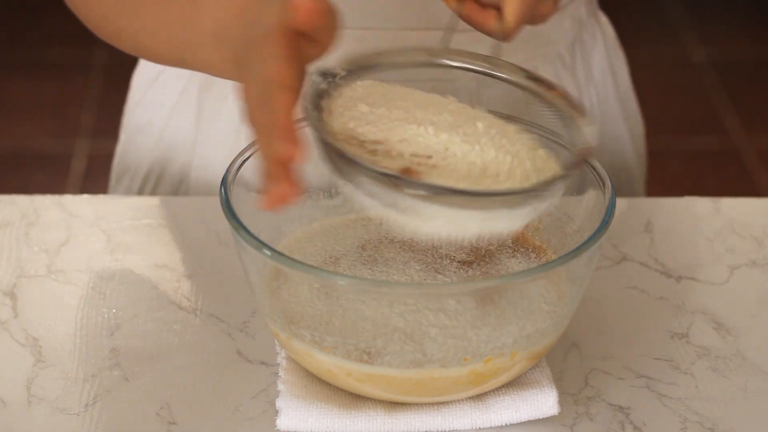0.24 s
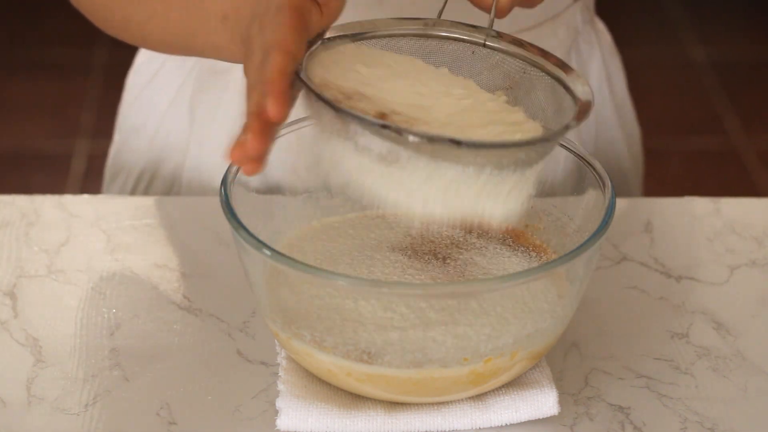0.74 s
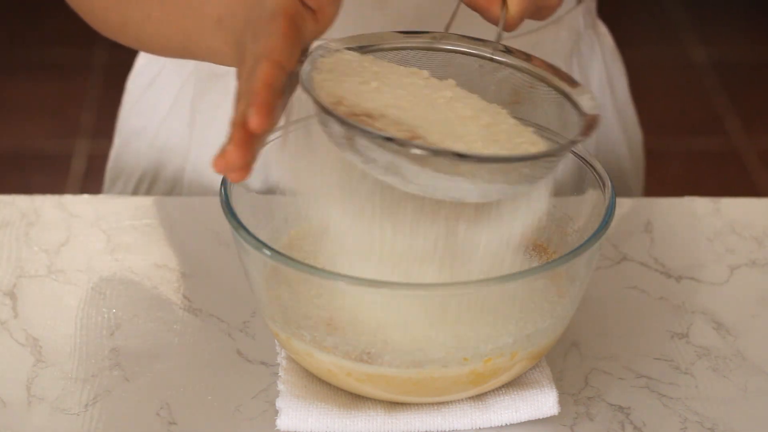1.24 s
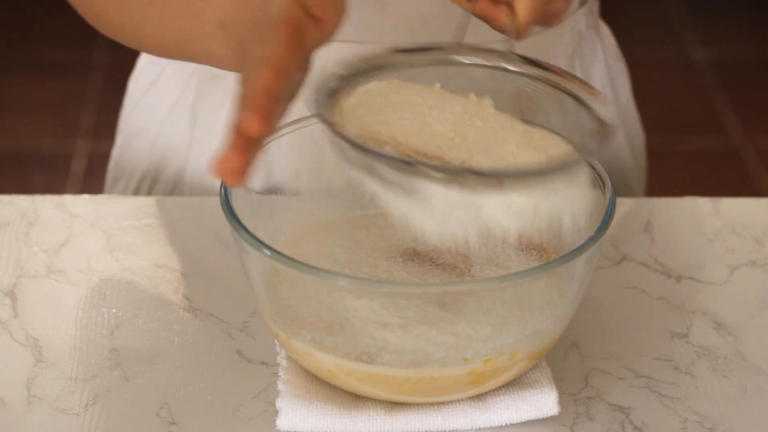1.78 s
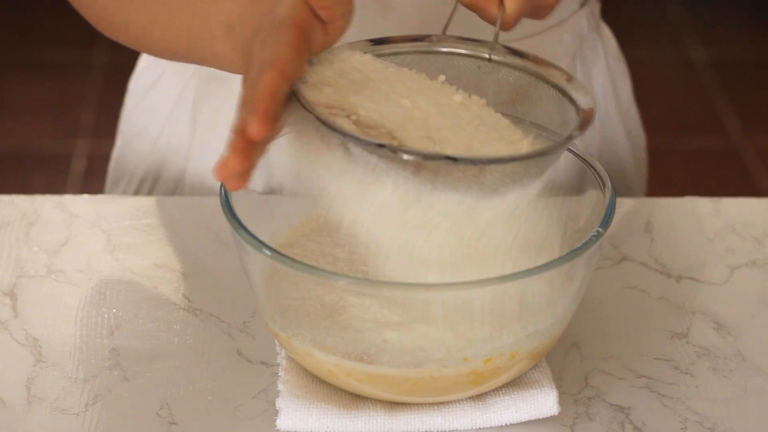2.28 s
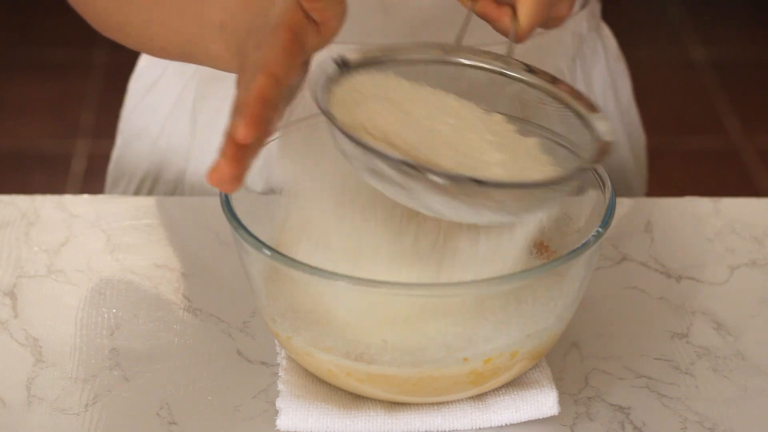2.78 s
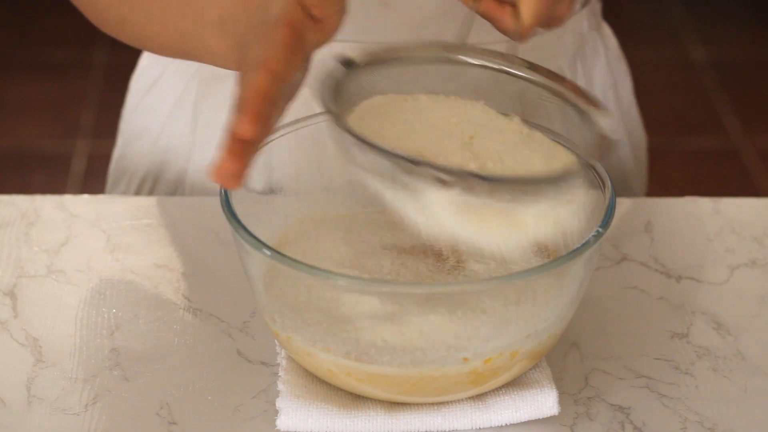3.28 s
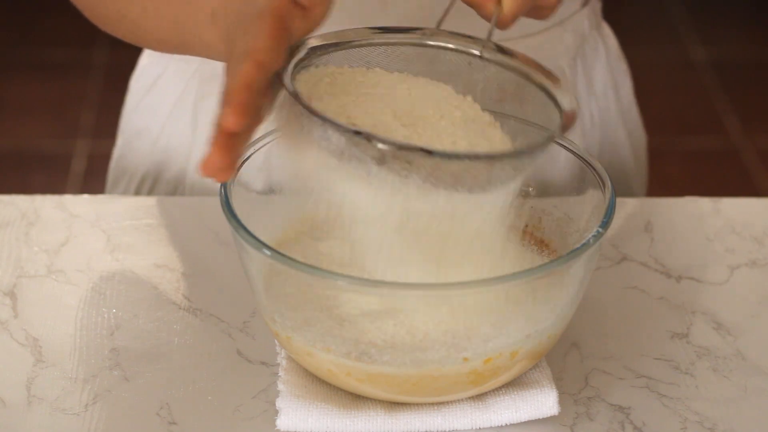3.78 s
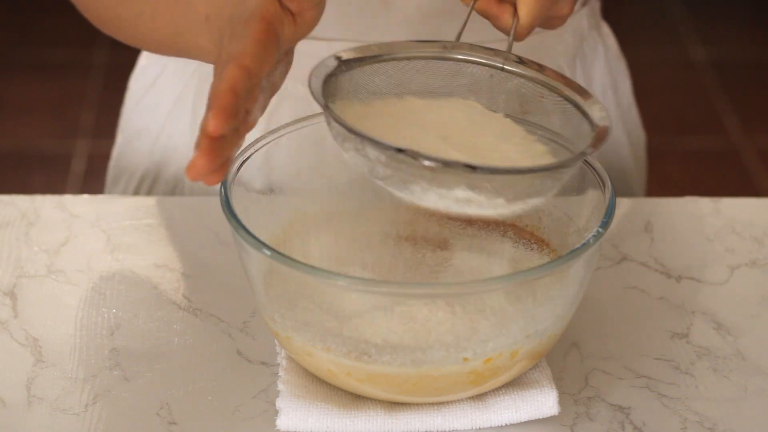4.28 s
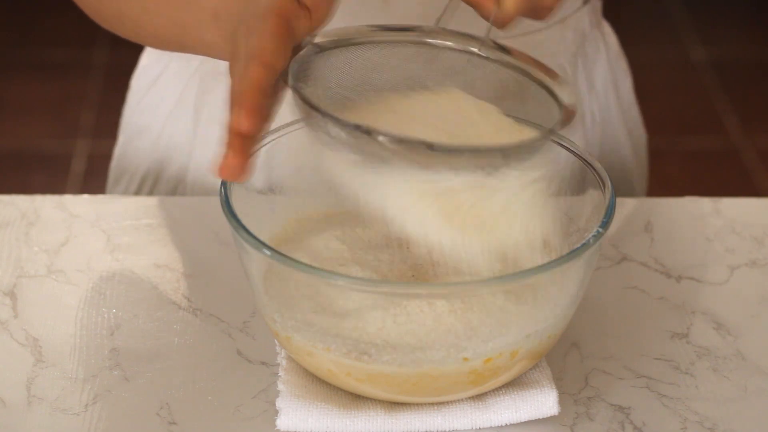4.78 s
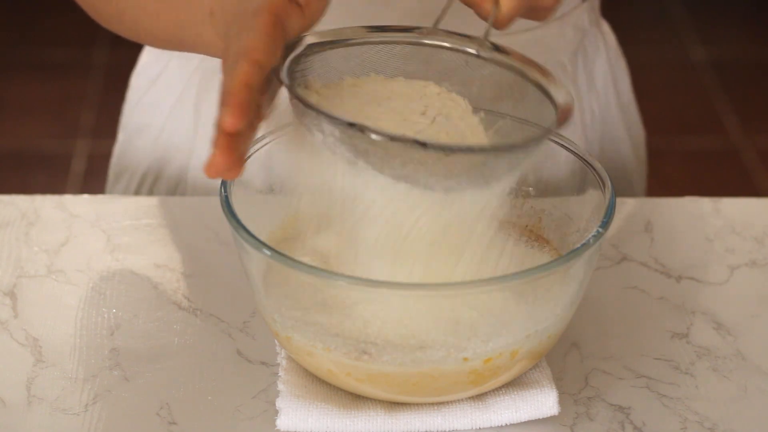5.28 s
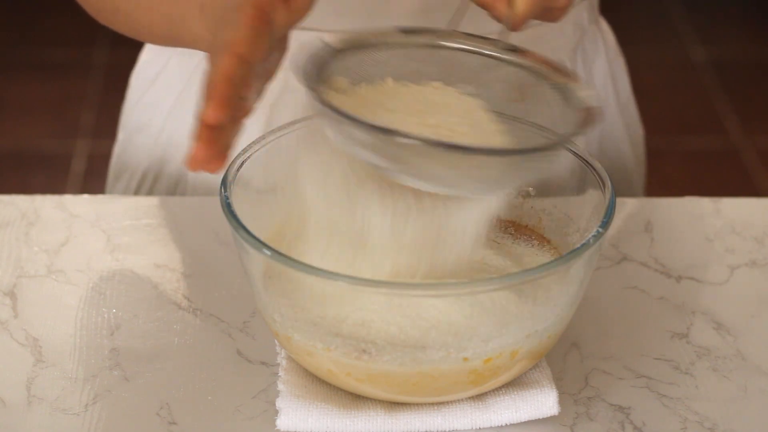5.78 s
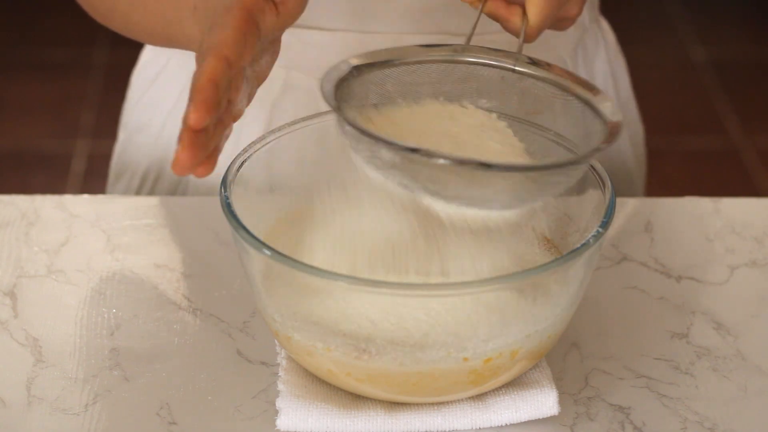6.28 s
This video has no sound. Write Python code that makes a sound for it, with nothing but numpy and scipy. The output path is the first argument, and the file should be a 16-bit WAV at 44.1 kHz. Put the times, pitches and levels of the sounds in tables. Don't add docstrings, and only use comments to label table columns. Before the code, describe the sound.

Flour is sifted by hand in a hard-walled kitchen, miked close with only a faint short room tail. Rapid, slightly uneven palm thumps continue throughout, with short sprays of powder through mesh, later stretching into a softer swishing sound. The rim barely rings, fingertips tick lightly, and low rumble, fridge hum and a high wavering whine stay underneath.

```python
import sys
import numpy as np
from scipy import signal
from scipy.fft import rfft, irfft
from scipy.io import wavfile
from scipy.ndimage import uniform_filter1d

SR = 44100
rng = np.random.default_rng(int(sys.argv[2]) if len(sys.argv) > 2 else 0)


def gain_from_db(level_db):
    decades = np.asarray(level_db, float) / 20
    return 10 ** decades


def int16_out(signal):
    q = np.round(np.clip(np.atleast_2d(signal).T, -1, 1) * 32767)
    wavfile.write(sys.argv[1], SR, q.astype(np.int16))


N = 288414
TIME = np.arange(N) / SR
FINGERS_LAG_S = .0085

# time in seconds, heel of hand in dB, fingers in dB, rim ring in dB.
TAPS = [(0.183, -52, -52, -72), (0.407, -38.5, -42.5, -58.5), (0.624, -46, -43.5, -70),
        (0.837, -42, -48, -62), (1.052, -49, -43, -57.5), (1.270, -47.5, -50, -57),
        (1.488, -45, -41.5, -58.5), (1.700, -45, -48, -55), (1.925, -51, -34.5, -56),
        (2.142, -36, -36.5, -52.5), (2.358, -40.5, -36, -55), (2.584, -43.5, -39, -57.5),
        (2.798, -40.5, -46, -66), (3.019, -56, -41, -65), (3.208, -55, -52, -66), (3.425, -41, -44, -65),
        (3.635, -51, -49, -62), (3.847, -48, -49, -68), (4.045, -37, -44.5, -71), (4.243, -51, -51, -78),
        (4.456, -41, -55, -69), (4.687, -54, -42, -60), (4.902, -36.5, -43.5, -66),
        (5.118, -39.5, -47, -68), (5.354, -59, -44, -66), (5.567, -55, -40, -64), (5.797, -43, -49, -71),
        (6.015, -59, -51, -61), (6.255, -53, -55, -73), (6.477, -54, -56, -69)]
# spray in dB, slide in dB, slide's lead on the tap in ms,
# heap slump in dB.
FLOUR = [(-68, -73, 37, -63), (-61.5, -67.5, 11, -71), (-55, -70.5, 28, -63), (-50.5, -70, 12, -65),
         (-50, -68.5, 1, -51), (-55.5, -67.5, 12, -56), (-52, -68.5, 30, -62), (-51, -69, 34, -48.5),
         (-51, -73, -15, -50), (-50, -71, 3, -55), (-50.5, -67, 12, -49), (-53, -70.5, 12, -57),
         (-55.5, -59.5, 30, -52.5), (-50.5, -69, 45, -56), (-53, -61, 28, -52), (-53, -61, 27, -53.5),
         (-53, -67.5, 35, -63), (-54, -69, 42, -61), (-56.5, -58.5, 32, -49.5), (-58, -67, 12, -58),
         (-54, -58.5, 20, -59), (-49.5, -62.5, 21, -55), (-54.5, -59.5, 28, -55), (-56, -61.5, 16, -51),
         (-50.5, -62.5, 57, -51), (-55, -58.5, 30, -52.5), (-56, -64, 38, -54.5), (-54, -58, 29, -66),
         (-55.5, -60, 30, -57), (-58, -60, 39, -73)]
# ratio to the strongest mode, level in dB, t60 in seconds.
RIM_MODES = [(.65, -5.5, 0.034), (.93, -14, 0.017), (0.999, -1.5, 0.055), (1.08, -3, 0.018),
             (1.37, -13, 0.017), (1.75, -7, 0.019)]
# frequency in Hz, density in dB per Hz.
SPRAY_COLOUR = [(300, 21), (800, 4), (1500, 1.5), (2500, 0), (4000, -1), (6000, 3.5), (8000, 3.5),
                (10000, 0), (13000, -0.5), (15500, -8)]
# frequency in Hz, density in dB per Hz.
SLIDE_COLOUR = [(300, -2.5), (700, 11.5), (1500, -1.5), (3000, -2.5), (5000, -2.5), (6800, -3.5), (7800, 1),
                (9500, -3.5), (13000, -4), (15500, -8.5)]
# centre in seconds, level in dB, resonance in Hz.
BACKSLIPS = [(0.546, -53, 465), (0.751, -53, 680), (0.968, -52.5, 640), (1.15, -56.5, 757),
             (1.429, -52.5, 621), (1.614, -53, 715), (1.83, -58, 720), (2.299, -52, 480),
             (2.513, -50.5, 467), (2.875, -52, 720), (2.973, -56, 635), (3.576, -56, 530),
             (3.183, -54, 420), (4.217, -55, 614), (4.438, -53, 705), (5.983, -53.5, 740)]
# time in seconds, level in dB.
FINGER_TICKS = [(0.344, -63), (0.6275, -62), (0.843, -59), (1.0482, -61), (1.271, -60), (1.489, -57),
                (4.0435, -59), (5.357, -58), (1.0582, -59), (1.7052, -49), (1.928, -56), (2.1389, -61),
                (2.3642, -53), (2.741, -62), (2.7608, -58), (5.5425, -57.5), (5.569, -55), (5.793, -55),
                (6.2045, -59), (6.4702, -58), (6.4834, -46), (6.4937, -58)]
# frequency in Hz, density in dB per Hz.
ROOM_COLOUR = [(20, -91), (35, -86), (80, -74), (140, -77.5), (230, -83.5), (400, -84), (550, -88.5),
               (700, -86), (950, -94), (1300, -92.5), (1600, -98), (2100, -97), (3200, -104), (15500, -118)]
# frequency in Hz, width in Hz, rms level in dB.
DRONES = [(64.1, 1.2, -61), (79.9, 1.65, -60.5), (118.2, 0.96, -64), (127.35, 4.7, -63),
          (169.7, 5.3, -65.5), (188.2, 6.7, -68.5)]
# time in seconds, pitch in Hz, level in dB.
RUMBLE = [
    (0, 36.8, -51),
    (1.0, 35.6, -63),
    (1.35, 36, -57),
    (1.9, 35.63, -46.5),
    (3.7, 35.9, -80),
    (5.0, 36.25, -60),
    (5.7, 35.58, -61),
    (5.9, 37.1, -46.5),
    (6.54, 35.5, -52),
]
# time in seconds, pitch in Hz, level in dB.
FRIDGE_HUM = [(0, 257, -66.5), (.7, 252.6, -56), (1.1, 253.8, -56), (1.6, 255, -59), (2.2, 254.1, -57),
              (2.55, 253, -62), (3.1, 256.2, -57), (3.7, 254.5, -63), (4.2, 253.5, -59.5),
              (4.75, 252.2, -55.5), (4.9, 248.2, -69), (6.54, 248, -69)]
# time in seconds, pitch in Hz, level in dB.
WHINE = [(0, 2135, -75), (.18, 2134, -69.5), (.21, 2230, -78), (.6, 2220, -67.5), (.9, 2230, -71),
         (1.3, 2225, -68.5), (2.2, 2246, -66.5), (3.3, 2222, -71.5), (4.6, 2212, -66.5), (5.2, 2222, -65.5),
         (5.7, 2219, -70.5), (6.1, 2246, -67.5), (6.54, 2253, -66.5)]


def unit(x):
    return x / np.sqrt(np.mean(x ** 2))


def colour(x, points):
    hz, db = np.transpose(points)
    bins = np.maximum(np.arange(N // 2 + 1) * SR / N, 1)
    gain = gain_from_db(np.interp(np.log(bins), np.log(hz), db, left=-150))
    return irfft(rfft(x) * gain, N)


def band(x, hz, width):
    return signal.lfilter(*signal.iirpeak(hz, hz / width, fs=SR), x)


def walk(rate):
    hold = int(SR / rate)
    levels = np.repeat(rng.standard_normal(N // hold + 1), hold)
    return 1.5 * uniform_filter1d(uniform_filter1d(levels, hold), hold)[:N]


def grains(spread_db):
    return rng.standard_normal(N) * gain_from_db(spread_db * rng.exponential(size=N))


def tone(curve, flutter_db, rate):
    s, hz, db = np.transpose(curve)
    phase = 2 * np.pi * np.cumsum(np.interp(TIME, s, hz)) / SR
    level = gain_from_db(np.interp(TIME, s, db) + flutter_db * walk(rate))
    return np.sqrt(2) * level * np.sin(phase)


def room_air():
    noise = colour(rng.standard_normal(N), ROOM_COLOUR) * np.sqrt(SR / 2)
    lows = [signal.sosfiltfilt(signal.butter(2, hz, fs=SR, output="sos"), noise)
            for hz in (150, 400, 1000, 2500, 6000)]
    parts = np.diff([np.zeros(N), *lows, noise], axis=0)
    drifts_db = (0.8, 1.43, 1.3, 0.76, 0.057, 0.52)
    return sum(part * gain_from_db(db * walk(11)) for part, db in zip(parts, drifts_db))


def room_drones():
    return sum(gain_from_db(db) * unit(band(rng.standard_normal(N), hz, width)) for hz, width, db in DRONES)


def fridge():
    s, _, db = np.transpose(FRIDGE_HUM)
    stir = unit(band(band(rng.standard_normal(N), 237, 110), 280, 110))
    return tone(FRIDGE_HUM, 1.65, 9) + gain_from_db(np.interp(TIME, s, db) - 5.5) * stir


def kitchen():
    return room_air() + room_drones() + tone(RUMBLE, 1.4, 5) + fridge() + tone(WHINE, 0.69, 14)


def slide():
    power = np.zeros(N)
    for (s, *_), (_, db, lead_ms, _) in zip(TAPS, FLOUR):
        spread_ms = max(16.7 + 2.2 * (-59 - db), 1)
        from_peak_ms = (TIME - s) * 1000 + lead_ms
        power += gain_from_db(db) ** 2 * np.exp(-.5 * (from_peak_ms / spread_ms) ** 2)
    clumps = gain_from_db(3.5 + 1.14 * walk(160))
    return unit(colour(grains(2.36), SLIDE_COLOUR)) * np.sqrt(power) * clumps


def palm():
    out = np.zeros(N)
    contacts = [(s + lag, db) for s, heel, fingers, _ in TAPS
                for lag, db in ((0, heel), (FINGERS_LAG_S, fingers))]
    for s, db in contacts:
        half_swing_ms = max(2.295 - .25 * s + 0.05 * (db + 40), .5) * np.exp(.2 * rng.standard_normal())
        near = slice(int(s * SR) - SR // 100, int(s * SR) + SR // 25)
        turns = (TIME[near] - s) * 1000 / half_swing_ms + 1.4
        pushed = np.maximum(turns, 0)
        swell = pushed ** .6 * np.exp(-pushed)
        out[near] -= gain_from_db(db + 9) * swell * np.cos(np.pi * (turns - 1.4))
    return out


def rim():
    out, age = np.zeros(N + SR), np.arange(SR // 8) / SR
    onset = 1 - np.exp(-age / 0.00023)
    contacts = [(s + 0.00048 + lag, ring + db) for s, _, _, ring in TAPS
                for lag, db in ((0, 0), (FINGERS_LAG_S, -3))]
    for s, ring_db in contacts:
        start = int(s * SR)
        rim_hz = 2078 * (1 + 0.022 * rng.standard_normal())
        for ratio, db, t60 in RIM_MODES:
            level_draw, pitch_draw = rng.standard_normal(2)
            hz = rim_hz * ratio * (1 + 0.008 * pitch_draw)
            ring = np.sin(2 * np.pi * hz * age) * onset * 1000 ** (-age / t60)
            out[start:start + len(age)] += gain_from_db(ring_db + db + 6.0 + level_draw) * ring
    return out[:N]


def spray():
    power = np.zeros(N)
    for (s, *_), (db, *_) in zip(TAPS, FLOUR):
        decay_ms = max(3.6 + s * (1.92 + 0.19 * (-51.5 - db)), 1)
        age = np.maximum(TIME - s, 0)
        onset = 1 - np.exp(-age / 0.0032)
        power += gain_from_db(db) ** 2 * np.exp(-age * 1000 / decay_ms) * onset ** 2
    clumps = gain_from_db(3.0 + 1.38 * walk(260))
    return unit(colour(grains(1.6), SPRAY_COLOUR)) * np.sqrt(power) * clumps


def slumps():
    rows = []
    for (s, *_), (*_, db) in zip(TAPS, FLOUR):
        lag_s = .010 - 2.5 * s / 1000
        rows.append((s + lag_s, db, 6.3 + 2.4 * s, 427 + 30.8 * s))
    return rows + [(s, db, 14, hz) for s, db, hz in BACKSLIPS]


def heap():
    out, span = np.zeros(N + SR), SR // 5
    from_centre_ms = (np.arange(span) - span / 2) / SR * 1000
    for s, db, spread_ms, hz in slumps():
        swell = np.exp(-.25 * (from_centre_ms / spread_ms) ** 2)
        coarse = unit(band(band(rng.standard_normal(span), hz, 350), hz, 330))
        start = int(s * SR) - span // 2
        out[start:start + span] += gain_from_db(db - 4.0) * swell * coarse
    return out[:N]


def crumbs():
    count = 30
    return list(zip(rng.random(count) * N / SR, -66 + 1.3 * rng.standard_normal(count)))


def ticks():
    out, age = np.zeros(N + SR), np.arange(SR // 100) / SR
    for s, db in [*FINGER_TICKS, *crumbs()]:
        wire = unit(band(rng.standard_normal(len(age)), 5100, 9000)) * np.exp(-age / 0.0019)
        start = int(s * SR)
        out[start:start + len(age)] += gain_from_db(db - 1.5) * wire
    return out[:N]


def walls(sieve):
    age = np.arange(SR // 4) / SR
    echoes = rng.standard_normal(len(age)) * 1000 ** (-age / .2) * (age > .004)
    return signal.fftconvolve(sieve, echoes / np.sqrt(np.sum(echoes ** 2)))[:N]


def scene():
    sieve = slide() + palm() + rim() + spray() + heap() + ticks()
    return (kitchen() + sieve + gain_from_db(-13) * walls(sieve))[None]


def roll_off(x):
    return signal.sosfilt(signal.butter(12, 15760, fs=SR, output="sos"), x)


def record(dry):
    offset, bulge_height, bulge_s, bulge_rad_per_s = .4288, .1815, .394, 3.17
    angle = np.clip(bulge_rad_per_s * (TIME - bulge_s), -np.pi / 2, np.pi / 2)
    return roll_off(dry + offset + bulge_height * np.cos(angle))


dry = scene()
out = record(dry)
int16_out(out)
```